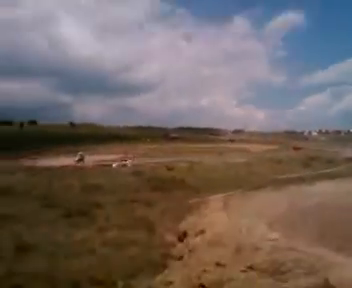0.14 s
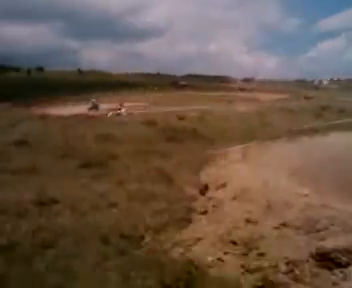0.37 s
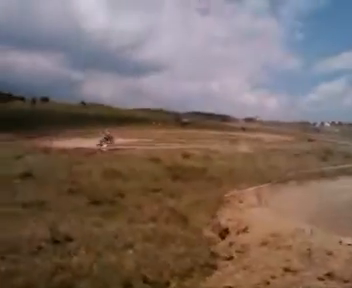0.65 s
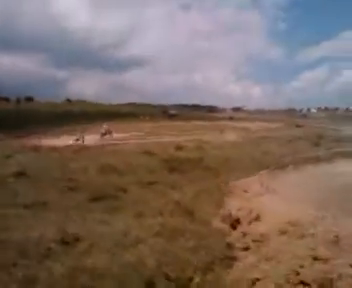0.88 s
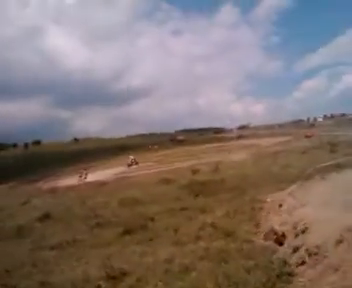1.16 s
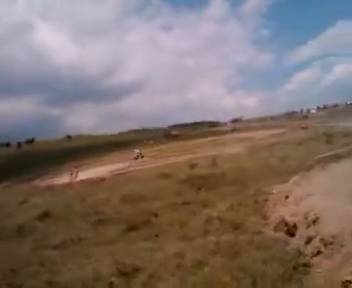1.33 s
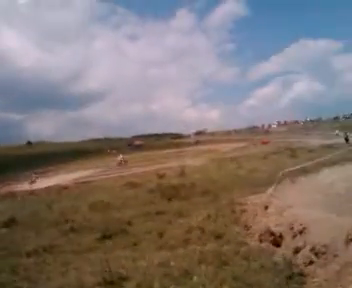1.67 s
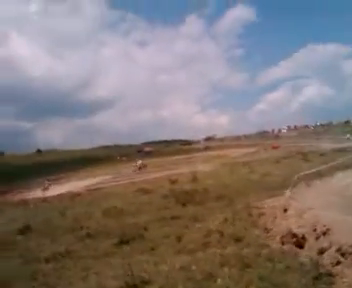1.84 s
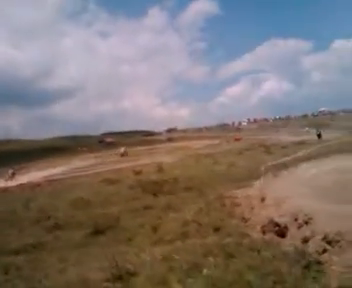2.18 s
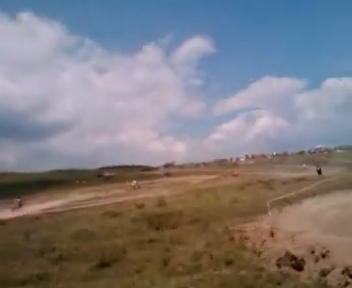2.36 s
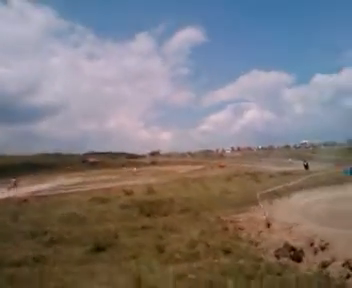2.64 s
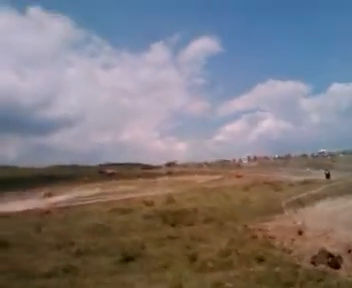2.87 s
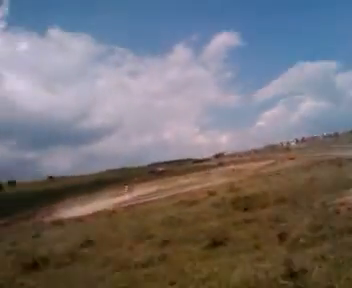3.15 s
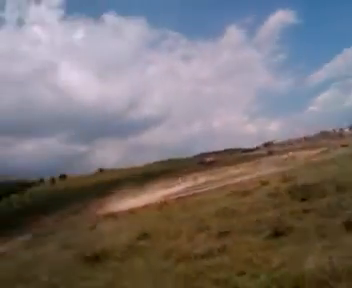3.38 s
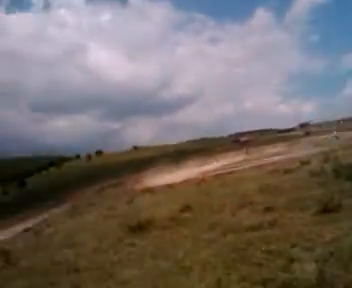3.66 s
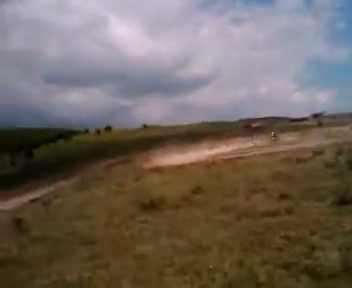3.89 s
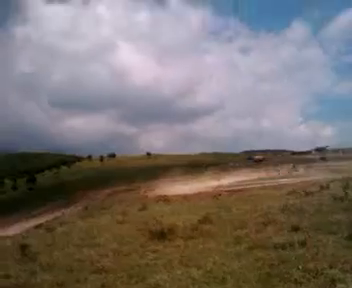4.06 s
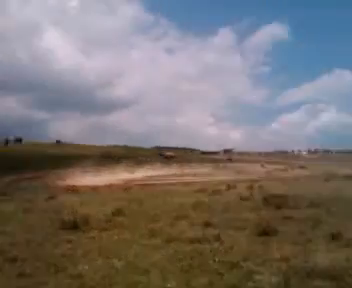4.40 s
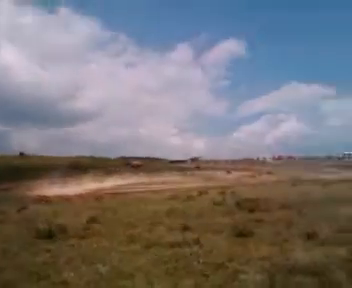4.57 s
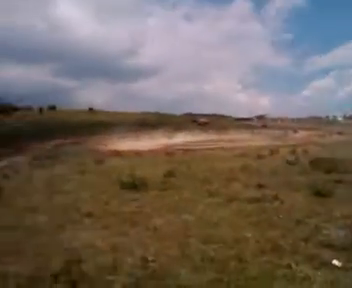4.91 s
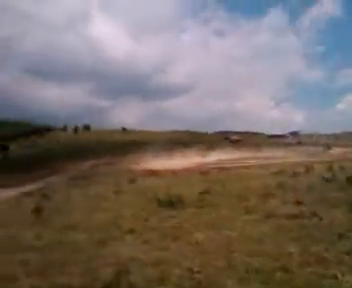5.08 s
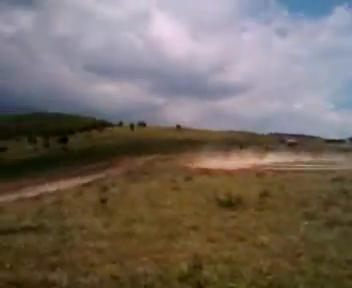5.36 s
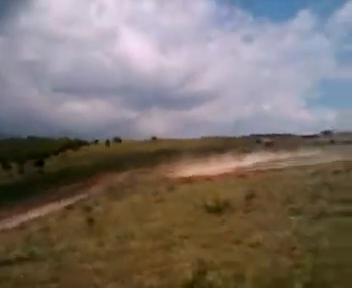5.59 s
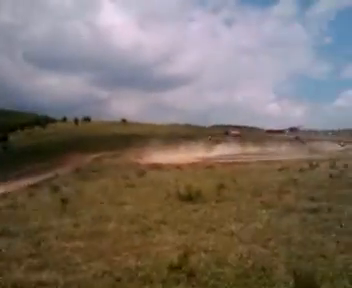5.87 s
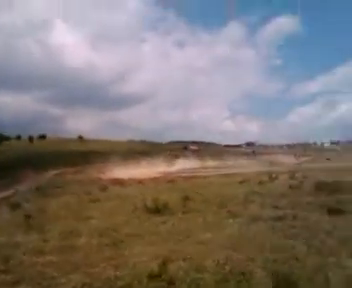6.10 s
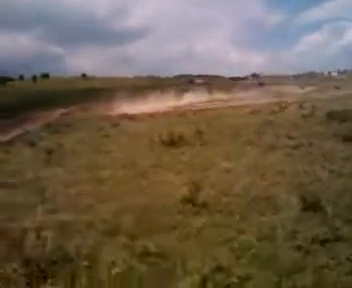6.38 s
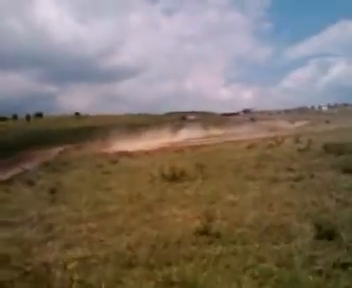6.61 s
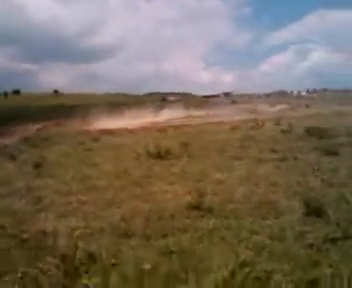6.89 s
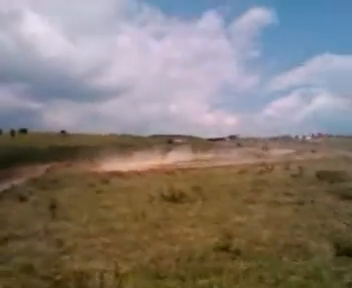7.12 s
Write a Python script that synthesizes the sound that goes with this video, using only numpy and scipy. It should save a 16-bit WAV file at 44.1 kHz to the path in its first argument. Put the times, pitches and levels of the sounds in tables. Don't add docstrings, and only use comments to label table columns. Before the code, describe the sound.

Outdoors on an open dirt track, a distant high-revving bike drones away as another rasps off at low revs. It climbs to a harsh roar, a duller rival joins briefly, and a second hard charge follows. The throttle shuts, leaving faint uneven engine pulls. Low wind thumps batter the small, muffled, overloaded microphone.

```python
import sys
import numpy as np
from scipy import signal
from scipy.fft import rfft, irfft, next_fast_len
from scipy.io import wavfile
from scipy.ndimage import uniform_filter1d, minimum_filter1d, map_coordinates

SR = 44100
rng = np.random.default_rng(int(sys.argv[2]) if len(sys.argv) > 2 else 0)


def field_ratio(decibels):
    return 10 ** (np.asarray(decibels, dtype=float) / 20)


def transcribe(signal):
    frames = np.atleast_2d(signal).T
    limited = np.clip(frames, -1, 1)
    pcm = np.round(limited * 32767).astype(np.int16)
    wavfile.write(sys.argv[1], SR, pcm)


N = 319475
NEAR_DB = -14


def along(points, hz):
    f, v = np.transpose(points)
    return np.interp(np.log(hz + 1), np.log(f + 1), v)


def unit(x):
    return x / np.sqrt(np.mean(x ** 2, axis=-1, keepdims=True) + 1e-20)


def curves(rows):
    s, *cols = np.transpose(rows)
    return [np.interp(np.arange(N) / SR, s, c) for c in cols]


def wobble(rate_hz):
    knots = rng.standard_normal(int(N * rate_hz / SR) + 4)
    return map_coordinates(knots, [np.arange(N) * rate_hz / SR])


def coloured(x, points):
    m = next_fast_len(N + 8192)
    gain = field_ratio(along(points, np.fft.rfftfreq(m, 1 / SR)))
    return irfft(rfft(x, m) * gain, m)[:N]


def resonance(f, hz, width_hz):
    return 1j * f * width_hz / (hz * hz - f * f + 1j * f * width_hz)


def laid(starts, rows):
    at = starts[:, None] + np.arange(rows.shape[1])
    return np.bincount(at.ravel(), rows.ravel(), N + SR)[:N]


def riders():
    # start_s, firing_hz
    launch = [(0.0, 22.4), (0.1, 30.2), (0.15, 29.1), (0.33, 35.8), (0.48, 34.5), (0.63, 39.3),
              (0.77, 30.4)]
    # start_s, firing_hz
    climb = [(1.28, 49.4), (1.33, 47.6), (1.7, 56.1), (1.85, 68.5), (1.93, 59.7), (2.21, 68.1)]
    # start_s, firing_hz
    chase = [(2.25, 46.1), (2.46, 45.9), (2.65, 55.1), (2.77, 52.9), (2.83, 44.4), (2.93, 47.4),
             (3.05, 41.7)]
    # start_s, firing_hz
    charge = [(3.21, 47.5), (3.56, 67.9), (3.63, 66.7), (3.83, 56.0), (4.04, 60.4), (4.24, 67.7),
              (4.33, 80.9)]
    # start_s, firing_hz
    coast = [
        (4.44, 67.2),
        (4.55, 49.9),
        (4.9, 45.7),
        (5.34, 46.0),
    ]
    # start_s, firing_hz
    leaving = [(5.39, 28.4), (5.49, 26.6), (5.67, 38.5), (5.92, 32.0), (6.07, 44.4), (6.24, 43.6),
               (6.35, 39.1), (6.6, 47.2), (6.72, 55.9)]
    # start_s, firing_hz
    last = [(6.9, 34.0), (6.98, 35.1), (7.07, 39.3), (7.14, 42.6), (7.24, 44.2)]
    rasp_db, dull_db, wet_db = exhaust()

    first_turns = [0.84, 0.62, 0.63, 0.64]
    pulls = [launch + climb, chase + charge + coast, leaving, last]
    shafts = [crank(pull, turn) for pull, turn in zip(pulls, first_turns)]
    firing_hz = sum(rate for rate, _ in shafts)
    bark_hz = 1812 - 11.5 * dull_db + 5.4 * (firing_hz - 45)
    body_db = -7.5 + 0.68 * dull_db
    voice = [rasp_db, dull_db, body_db, bark_hz]
    direct = sum(cracks(shaft, voice, db) for shaft, db in zip(shafts, [1.2, 1.2, 1.3, 2]))

    roar_db = -4 + 0.3033 * (NEAR_DB - rasp_db) + wet_db
    m = next_fast_len(N)
    f = np.fft.rfftfreq(m, 1 / SR)

    def swaying_band(response):
        noise = irfft(rfft(rng.standard_normal(m)) * response, m)[:N]
        return unit(noise) * field_ratio(2.2 * wobble(25))

    roar = swaying_band(resonance(f, 3130, 1200))
    roar = roar + field_ratio(dull_db) * swaying_band(resonance(f, 1903, 1900) ** 2)
    roar = roar + field_ratio(body_db) * swaying_band(resonance(f, 900, 1400))
    return field_ratio(1.18) * direct + field_ratio(rasp_db + roar_db) * roar


def exhaust():
    # start_s, rasp_db, dull_db, extra_roar_db
    turning = [(0, -35, 5, -5), (.22, -38, 9.5, -4.5), (.42, -31.5, 6.5, -5.5), (.52, -23.5, -7.5, -2),
               (.68, -27, -6, -1.5), (.78, -31.5, 1.5, -8)]
    # start_s, rasp_db, dull_db, extra_roar_db
    climbing = [(.9, -24.5, -2, -8), (1.08, -22.5, 0.5, -4), (1.18, -16, -8, -3.5), (1.5, -15, -8.5, -1.5),
                (1.7, -11.5, -11.5, -2), (1.85, -12, -14.5, -1.5), (2.05, -12.5, -11, -2),
                (2.18, -15.5, -11, -4), (2.21, -16.5, -5.5, -8.5), (2.23, -25, -5, -1.5)]
    # start_s, rasp_db, dull_db, extra_roar_db
    chasing = [(2.27, -15, -11.5, -7.5), (2.359, -14.5, -10, -10), (2.459, -22.5, -3, -5),
               (2.58, -17.5, -13, -4), (2.75, -18, -5, -6), (3.0, -27, -1.5, -0.5)]
    # start_s, rasp_db, dull_db, extra_roar_db
    charging = [(3.08, -20.5, -0.5, -6.5), (3.2, -14, -6.5, -4), (3.3, -17, -2.5, -3.5),
                (3.45, -15.5, -11.5, 0.5), (3.58, -11.5, -19, -0.5), (3.7, -14, -22.5, -2),
                (3.78, -19, -13.5, -2)]
    # start_s, rasp_db, dull_db, extra_roar_db
    cutting = [(4.0, -17, -15.5, -1), (4.1, -11.5, -22, -7.5), (4.261, -14.5, -12, -7),
               (4.33, -19, 2.5, -4.5), (4.369, -21, -5, -2), (4.4, -28.5, -3, -0.5),
               (4.48, -28.5, -5, -1.5)]
    # start_s, rasp_db, dull_db, extra_roar_db
    coasting = [(4.559, -37, 1, -5), (4.8, -36.5, -5.5, -4.5), (5.05, -34, -9.5, -6), (5.15, -41, 0.5, -5),
                (5.34, -46, -7.5, 4)]
    # start_s, rasp_db, dull_db, extra_roar_db
    exiting = [(5.41, -36, -9, -6), (5.52, -37, -1.5, -8.5), (5.6, -32, 2.5, -7.5), (5.71, -44, -4.5, 0.5),
               (5.78, -26.5, -16, -5), (5.88, -32, -22, -6), (5.981, -28, -14.5, -0.5)]
    # start_s, rasp_db, dull_db, extra_roar_db
    fading = [(6.08, -24, -29.5, -2), (6.25, -31, -13.5, -0.5), (6.41, -25.5, -22.5, -8.5),
              (6.501, -35, 0.5, -4.5), (6.68, -32.5, -4, -4.5), (6.73, -46, -6, 1),
              (6.85, -47.5, -17.5, -1), (7.0, -41, -27, -3), (7.24, -36.5, -25.5, 1.5)]
    early = turning + climbing + chasing + charging
    late = cutting + coasting + exiting + fading
    return curves(sorted(early + late))


def crank(pull, first_turn):
    t = np.arange(N) / SR
    rate = curves(pull)[0] * (t >= pull[0][0]) * (t <= pull[-1][0])
    return rate, first_turn + np.cumsum(rate) / SR


def cracks(shaft, voice, scatter_db):
    rate, turns = shaft
    at = np.flatnonzero(np.diff(np.floor(turns)))
    rasp_db, bark_db, body_db, bark_hz = (v[at, None] for v in voice)
    luck = 2 * np.tanh(rng.standard_normal((len(at), 9)) / 2)
    t, f = np.arange(1024) / SR, np.fft.rfftfreq(2048, 1 / SR)
    noise = rng.standard_normal((len(at), len(t)))

    front = -np.exp(-t / 0.000095)
    snap = 2.94 * front + noise * np.exp(-t / 0.0013)
    drag_ms = np.clip(5.8 + 0.13 * (rasp_db - NEAR_DB), 1, 10)
    drag_s = drag_ms / 1000 * np.exp(0.44 * luck[:, :1])
    fizz = noise * (1 - np.exp(-t / 0.0004)) * np.exp(-(t / drag_s) ** 1.7)

    rasp_hz = (3042 + 5.5 * (rasp_db - NEAR_DB)) * np.exp(0.064 * luck[:, 8:])
    rasp = resonance(f, rasp_hz, 320) + 0.4 * resonance(f, 2460, 480)
    bark = resonance(f, bark_hz * np.exp(0.06 * luck[:, 1:2]), 700) ** 2
    body = resonance(f, 1100, 1400)
    thud = resonance(f, 380, 410)
    parts = [(fizz + 0.5 * snap, rasp, 0),
             (snap + 0.81 * fizz, bark, bark_db),
             (snap + 0.64 * fizz, body, body_db),
             (front + 0 * noise, thud, -10.5 + 1.5 * bark_db)]
    rows = 0
    for k, (source, response, db) in enumerate(parts):
        ring = irfft(rfft(source, 2048) * response)[:, :len(t)]
        rows = rows + unit(ring) * field_ratio(db + 2 * luck[:, 2 + k, None])

    share = np.sqrt(SR / len(t) / rate[at, None])
    late = np.round(0.0004 * SR * luck[:, 7]).astype(int)
    level = field_ratio(rasp_db + scatter_db * luck[:, 6:7])
    return laid(np.maximum(at + late, 0), rows * share * level)


def rival():
    # start_s, firing_hz
    pull = [
        (2.48, 37.5),
        (2.59, 39),
        (2.665, 41.5),
        (2.76, 45),
    ]
    flat = np.ones(N)
    voice = [-21.5 * flat, -3 * flat, -5 * flat, 1450 * flat]
    return cracks(crank(pull, 0.85), voice, scatter_db=1.5)


def leader():
    # start_s, firing_hz
    pull = [(0.0, 73.8), (0.09, 78.3), (0.19, 86.8), (0.28, 81.6), (0.37, 74.0), (0.46, 69.4), (0.56, 72.8),
            (0.65, 79.8)]
    # start_s, rasp_db, low_drone_db, upper_drone_db
    away = [(0, -38, -33, -40.5), (.1, -28.5, -41, -37), (.14, -44, -19, -55.5), (.3, -39, -21.5, -46),
            (.36, -32, -48, -26), (.53, -30.5, -45, -30.5), (.58, -40.5, -35, -29.5),
            (.66, -32.5, -63, -63)]
    # multiple, level_db
    orders = [(2, -18), (3, -3), (4, -1), (5, -3.5), (6, -2.5), (7, -9)]
    rasp_db, low_db, upper_db = curves(away)
    rate, turns = crank(pull, 0.72)
    drone = 0
    for k, db in orders:
        drone_db = upper_db if k > 3 else low_db
        drone = drone + field_ratio(db + drone_db + 1.2 * wobble(12)) * np.sin(2 * np.pi * k * turns)
    flat = np.ones(N)
    voice = [rasp_db, 2.8 * flat, -8 * flat, 1700 * flat]
    return cracks((rate, turns), voice, scatter_db=3.5) + drone * (rate > 0)


def wind():
    # start_s, swing_db
    lumps = [(0, 3.5), (2.7, 2), (3, 6), (4.4, 4), (7.24, 4.5)]
    # freq_hz, density_db_per_hz
    buffet_colour = [(76, -51), (130, -26.5), (243, 3.5), (354, 1.5), (682, -15), (1220, -31.5),
                     (1500, -31), (1950, -63.5), (3300, -120)]
    # freq_hz, density_db_per_hz
    tear_colour = [(250, -37.5), (500, 4), (900, -6.5), (1400, -15.5), (2500, -59.5)]
    # freq_hz, density_db_per_hz
    rumble_colour = [(15, -34), (30, -19), (60, -8), (120, -8.5), (170, -12), (300, -47)]
    # start_s, peak_db, ring_hz
    strikes = [(2.818, -19, 275), (2.878, -20, 323), (3.075, -12, 299), (3.15, -11, 288), (3.328, -7, 350),
               (3.43, -12, 506), (3.53, -9, 361), (3.571, -10, 423), (3.661, -12, 366), (3.683, -9, 310),
               (3.834, -10, 350), (3.989, -12, 363), (4.065, -14, 283), (4.165, -11, 404),
               (4.248, -12, 347), (4.567, -16, 283), (4.858, -14, 328), (5.016, -8, 318), (5.222, -10, 253),
               (5.285, -16, 301), (5.682, -9, 240), (6.145, -20, 266), (6.173, -13, 345), (6.224, -12, 296),
               (6.252, -18, 850), (6.481, -17, 320), (6.706, -11, 310), (6.846, -9, 293), (7.033, -21, 296),
               (7.182, -19, 242)]
    gust_db = gusting()
    uneven_db = curves(lumps)[0]

    rush = unit(field_ratio(uneven_db * wobble(45)) * coloured(rng.standard_normal(N), buffet_colour))
    when_s = rng.random((800, 1)) * (N - 1) / SR
    luck = rng.standard_normal((800, 2))
    size_db = 1.09 * uneven_db[(when_s * SR).astype(int)] * luck[:, :1]
    eddies = unit(thumps(when_s, size_db, 330 * np.exp(0.28 * luck[:, 1:]), decay_s=0.0038))
    buffet = field_ratio(gust_db - 6.5) * (rush + 1.04 * eddies)

    tear = unit(field_ratio(4 * wobble(60)) * coloured(rng.standard_normal(N), tear_colour))
    tear_db = -36 + 1.5 * (gust_db + 21)

    rumble = unit(field_ratio(3 * wobble(26)) * coloured(rng.standard_normal(N), rumble_colour))
    rumble_db = -43.5 + 0.36 * (gust_db + 28) + 0.41 * (exhaust()[0] + 24)

    s, db, hz = np.transpose(strikes)[:, :, None]
    strong = thumps(s, db + 6.0, hz, decay_s=0.0052)
    return buffet + field_ratio(tear_db) * tear + field_ratio(rumble_db) * rumble + strong


def gusting():
    # start_s, level_db
    breeze = [(0, -21), (.4, -27), (.65, -25), (1.2, -34), (1.7, -30), (2.2, -34.5), (3, -34), (4.3, -45.5),
              (4.45, -34), (5.4, -37.5), (6.1, -41), (7.24, -37.5)]
    # start_s, length_s, level_db
    gusts = [(2.799, 0.17, -27), (3.064, .34, -20.5), (3.429, 0.48, -14), (3.821, 0.023, -16),
             (3.903, 0.13, -18.5), (4.066, 0.052, -17), (4.178, 0.025, -17.5), (4.241, 0.0069, -19),
             (4.317, .07, -21), (4.516, 0.013, -30.5), (4.563, 0.017, -20.5), (4.63, .22, -27),
             (4.852, 0.014, -19.5), (5.011, 0.04, -21), (5.088, .085, -20), (5.225, .04, -16),
             (5.284, 0.027, -19.5), (5.352, 0.069, -19.5), (5.492, 0.24, -32.5), (5.687, 0.063, -15),
             (5.768, 0.11, -21.5), (6.17, 0.11, -17), (6.303, 0.12, -20.5), (6.48, .02, -26),
             (6.536, .1, -26.5), (6.705, 0.046, -17.5), (6.77, .12, -22.5), (6.892, 0.066, -21),
             (7.026, 0.08, -26.5), (7.176, .04, -24.5)]
    rise_db_per_s, sag_db_per_s, fall_db_per_s = 903.5, 16.5, 588.5
    t = np.arange(N) / SR
    strength_db = curves(breeze)[0]
    for s, length_s, db in gusts:
        rise = rise_db_per_s * np.maximum(s - t, 0)
        sag = sag_db_per_s * np.clip(t - s, 0, length_s)
        fall = fall_db_per_s * np.maximum(t - s - length_s, 0)
        strength_db = np.maximum(strength_db, db - rise - sag - fall)
    return strength_db


def thumps(s, db, hz, decay_s):
    # freq_hz, gain_db
    port = [(60, -28.5), (130, -10), (220, -1.5)]
    t = np.arange(1200) / SR
    envelope = (1 - np.exp(-t / 0.0006)) * np.exp(-t / decay_s)
    rings = field_ratio(db) * np.sin(2 * np.pi * hz * t) * envelope
    return coloured(laid((s[:, 0] * SR).astype(int), rings), port)


def scene():
    return (riders() + rival() + leader() + wind())[None]


def band_limit(x):
    return signal.sosfilt(signal.butter(12, 15850, fs=SR, output="sos"), x)


def record(dry):
    # freq_hz, gain_db
    mic = [(20, -10), (100, -3.5), (3300, 0.5), (3500, -7.5), (3900, -6), (4300, -12.5), (4600, -22),
           (4800, -43), (5200, -89)]
    # start_s, peak_db
    overloads = [(0.3914, -26.5), (1.6198, -45), (1.6727, -43.5), (1.778, -38), (1.932, -41.5),
                 (2.0413, -52.5), (2.0447, -55.5), (2.0623, -51.5), (2.0937, -34), (2.2785, -49),
                 (2.559, -47.5), (2.575, -27.5), (2.5965, -31), (3.2018, -28.5), (3.2835, -35),
                 (3.5379, -12.5), (3.5722, -29.5), (3.6124, -51.5), (3.69, -59), (3.854, -47),
                 (3.859, -38.5), (3.9925, -24), (4.0648, -29), (4.0811, -24.5), (4.124, -28.5),
                 (4.1229, -34.5), (4.1682, -44), (4.17, -20.5), (4.299, -23), (7.2432, -38)]
    ceiling = 0.7
    heard = coloured(dry[0], [(3500, 0), (3800, -12), (6000, -30)])
    size = np.abs(signal.hilbert(heard, next_fast_len(N))[:N])
    gain = (1 + (size / ceiling) ** 5) ** (-1 / 5)
    gain = uniform_filter1d(minimum_filter1d(gain, size=31), size=31)
    held = coloured(heard * gain, mic)

    s, db = np.transpose(overloads)
    peaks = field_ratio(0.62 * db - 5.0) * rng.choice([-1, 1], len(s))
    ticks = np.bincount((s * SR).astype(int), peaks, N)[:N]
    mix = held + coloured(ticks, [(5000, 6), (9000, 0), (15000, -2)])
    return band_limit(mix[None])


dry = scene()
out = record(dry)
transcribe(out)
```